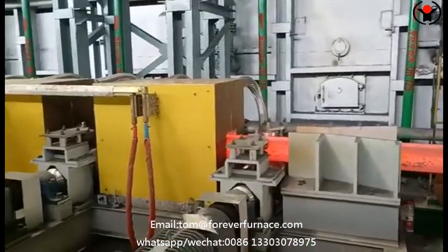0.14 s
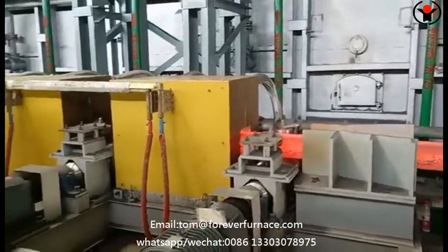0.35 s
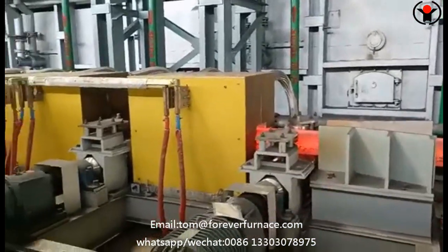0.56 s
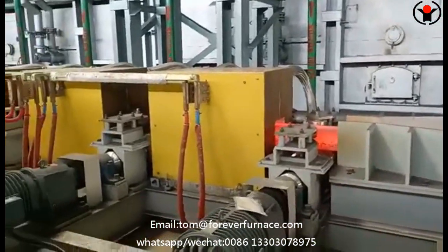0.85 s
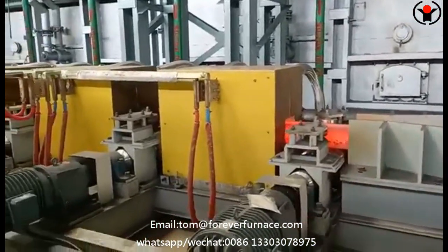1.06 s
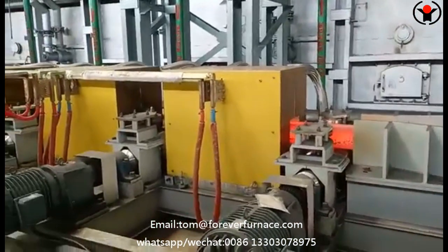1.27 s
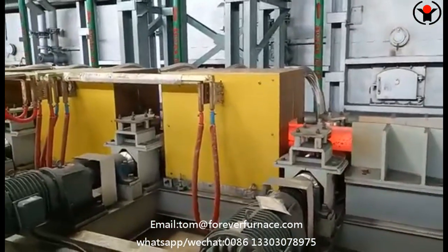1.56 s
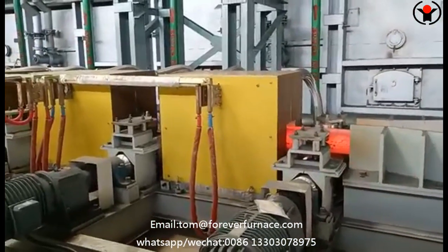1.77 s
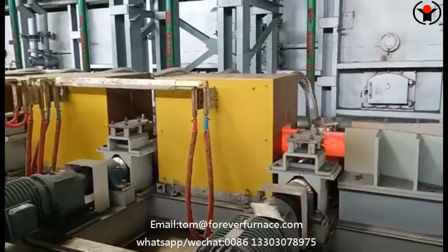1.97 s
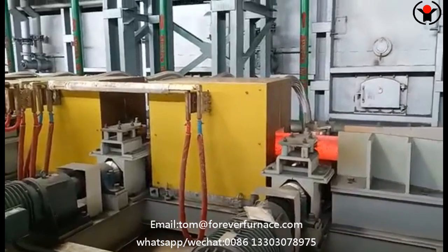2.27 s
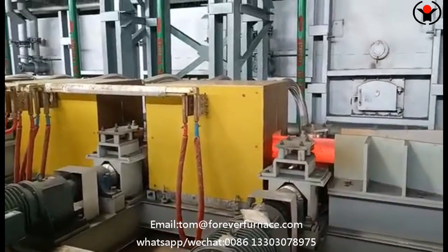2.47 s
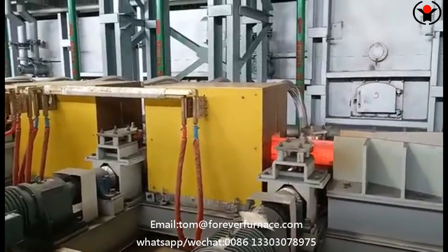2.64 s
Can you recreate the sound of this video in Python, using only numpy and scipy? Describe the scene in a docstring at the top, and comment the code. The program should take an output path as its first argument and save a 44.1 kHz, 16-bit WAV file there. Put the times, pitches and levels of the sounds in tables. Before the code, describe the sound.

Two induction heaters whine at close, high pitches that beat together in a factory hall. A few brief noise pulses pass, then machinery rumble, roar and hiss swell. The whine shifts between the ears of a nearby stereo microphone.

```python
"""A factory hall, stereo microphone near one of two induction heaters, machinery all around.
From the start both whine over rumble, roar and hiss; the near one creeps up in pitch, the other holds
steady, and the two beat. The microphone drifts through their standing waves, so each partial swells
and fades differently in each ear. From 0.7 to 1 s the noise pulses four times, the whine dipping in
between. After 1.2 s the background noise swells strongly."""
import sys
import numpy as np
from scipy import signal
from scipy.fft import rfft, irfft, next_fast_len
from scipy.io import wavfile
from scipy.ndimage import uniform_filter1d, minimum_filter1d, map_coordinates

SR = 44100
rng = np.random.default_rng(int(sys.argv[2]) if len(sys.argv) > 2 else 0)


def dump_mix(stems):
    """Bounce the given channels to the path in sys.argv[1] as a 16-bit WAV at rate SR."""
    frames = np.atleast_2d(stems).T  # one column per channel
    limited = np.clip(frames, -1, 1)  # hard clip at full scale
    pcm = np.round(limited * 32767).astype(np.int16)
    wavfile.write(sys.argv[1], SR, pcm)


N = 123921
TIME = np.arange(N) / SR


def amp(db):
    """Decibels to gain."""
    return 10 ** (np.asarray(db) / 20)


def unit(x):
    """Scale to rms 1."""
    return x / np.sqrt(np.mean(np.abs(x) ** 2) + 1e-20)


def along(points, hz):
    """(f/Hz, value) points read on a log axis."""
    f, values = np.transpose(points)
    return np.interp(np.log(hz + 1), np.log(f + 1), values)


def curves(rows):
    """One value per sample for each column after the time."""
    times, *columns = np.transpose(rows)
    return np.array([np.interp(TIME, times, column) for column in columns])


def bump(at, width):
    """A Gaussian in time, peak 1."""
    return np.exp(-.5 * ((TIME - at) / width) ** 2)


def wobble(rate):
    """A smooth random curve, rate knots a second."""
    return map_coordinates(rng.standard_normal(4096), [TIME * rate], mode="wrap")


def scatter(rate):
    """A randomly wandering amplitude and phase for each ear."""
    return unit(np.array([wobble(rate) + 1j * wobble(rate) for ear in range(2)]))


def filtered(x, response):
    """x times a response of frequency."""
    size = next_fast_len(N + SR // 4)
    return irfft(rfft(x, size) * response(np.fft.rfftfreq(size, 1 / SR)), size)[..., :N]


def whine(hz, leads, partials):
    """A coil sings at multiples of its drive pitch; standing waves set level and phase in each ear."""
    cycles = np.cumsum(hz) / SR
    out = np.zeros((2, N))
    for k, (lead, levels) in enumerate(zip(leads, partials), 1):
        ear_phase = np.array([[-.5], [.5]]) * curves(lead)
        flutter = amp(-20.5 + 4.5 * (k - 1)) * scatter(rate=25)  # shifting reflections
        fuzz = amp(-23.5) * scatter(rate=150)
        halo = amp(-30) * scatter(rate=410)
        tone = np.exp(2j * np.pi * (k * cycles + rng.random()) + 1j * ear_phase)
        out += np.sqrt(2) * amp(curves(levels)) * np.real((1 + flutter + fuzz + halo) * tone)
    return out


# Drive pitch of the near heater: t/s, f/Hz
NEAR_PITCH = [(0, 1525), (.3, 1530.3), (.6, 1535), (.9, 1539.5), (1.2, 1543), (1.5, 1547), (1.8, 1550.5),
              (2.2, 1553), (2.8, 1554)]
# Its partials at the microphone, lowest first: t/s, left level/dB, right level/dB
NEAR_H1 = [(0, -6.5, -7), (.2, -12.5, -14), (.39, -18, -8.5), (.8, -18.5, -6), (1.08, -24.5, -11.5),
           (1.16, -41, -15), (1.295, -19, -19), (1.38, -12, -9), (1.47, -13.8, -17.5), (1.65, -9.5, -10.5),
           (1.79, -9, -17.5), (1.91, -8.5, -9.5), (2.05, -11.2, -12.5), (2.2, -13, -9.5), (2.3, -19, -8),
           (2.37, -17, -13.5), (2.5, -12.5, -11.5), (2.65, -11.5, -17.5), (2.8, -9, -14.5)]
NEAR_H2 = [(0, -50, -36.5), (.1, -51, -26), (.21, -30, -36.5), (.4, -39.5, -30.5), (.56, -33, -31.5),
           (.75, -35.5, -34), (.94, -36, -28.5), (1.12, -47, -33), (1.21, -29.5, -34), (1.3, -16, -31),
           (1.4, -20, -21.5), (1.62, -25, -27.5), (1.75, -38.5, -33.5), (1.89, -23, -28.5),
           (2.05, -29.5, -45), (2.18, -24.5, -36), (2.42, -23.5, -42), (2.6, -30, -25.5),
           (2.8, -26.5, -28.5)]
NEAR_H3 = [(0, -44.5, -35.5), (.21, -33.5, -52), (.36, -38.5, -54), (.4, -31.5, -49), (.55, -44, -52),
           (.68, -35, -58), (.74, -51, -63), (.84, -36.5, -60), (.96, -55, -59), (1.05, -35.5, -47),
           (1.25, -43, -54), (1.369, -31.5, -29.5), (1.45, -39, -39.5), (1.5, -32.5, -26.5),
           (1.7, -32.5, -30.5), (1.85, -41, -43), (2.04, -40, -40), (2.2, -45, -46.5), (2.801, -48, -56)]
NEAR_H4 = [(0, -59, -59), (.35, -55, -58), (.48, -55, -39.5), (.62, -50.5, -44.5), (.78, -53.5, -42),
           (0.939, -51, -42.5), (1.03, -47, -61.5), (1.42, -61, -47), (1.55, -43.5, -35), (1.8, -43.5, -33),
           (2.05, -39.5, -35.5), (2.4, -38.5, -39), (2.8, -45, -42.5)]
NEAR_H5 = [(.4, -61, -56.5), (.7, -70, -70.5), (1.4, -58, -60.5)]
# Right ear's lead over the left, one curve per partial: t/s, phase/rad
NEAR_RIGHT_LEAD = [
    [(0, 3), (.4, 3.35), (1.08, 2.7), (1.2, 2), (1.29, 3.14), (1.35, 4.2), (1.47, 4.5), (1.55, 5.3),
     (2.18, 7.35), (2.8, 5.9)],
    [(0, -1.8), (.37, .6), (.58, -1), (.74, -3.1), (.88, -3.1), (1, -2.2), (1.6, .6), (2, 1.9), (2.2, .5)],
    [(.2, 2), (.4, 0), (1.05, 0), (1.35, -4.3), (1.95, -4.8), (2.1, -6.5)],
    [(.75, 2.7), (.95, -1), (1.4, 1), (1.6, -.2)],
    [(0, 0)],
]

def near_heater():
    """The coil nearer the microphone, creeping up in pitch."""
    return whine(curves(NEAR_PITCH)[0], NEAR_RIGHT_LEAD, [NEAR_H1, NEAR_H2, NEAR_H3, NEAR_H4, NEAR_H5])


# The other heater's partials at the microphone: t/s, left level/dB, right level/dB
STEADY_H1 = [(0, -46, -22), (.4, -30.5, -22), (1.1, -27.5, -21.5), (1.34, -17.5, -13.5), (1.5, -19, -16),
             (2.3, -21, -19), (2.8, -18, -16)]
STEADY_H2 = [(0, -55, -38.5), (.95, -52, -45.5), (1.22, -29.5, -37), (1.42, -31, -28.5),
             (1.9, -31.5, -32.5), (2.8, -34.5, -30)]
STEADY_H3 = [(0, -43, -53), (.7, -62.5, -63), (1.25, -41, -45.5), (2.799, -44, -52.5)]
# Right ear's lead, one curve per partial: t/s, phase/rad
STEADY_RIGHT_LEAD = [
    [(0, .3), (.7, -.9), (1.15, -2.9)],
    [(1.1, .3), (1.75, -4.8)],
    [(0, -2)],
]

def steady_heater(hz=1484.2):
    """The farther coil holds a pitch just below the near one and beats with it."""
    return whine(np.full(N, hz), STEADY_RIGHT_LEAD, [STEADY_H1, STEADY_H2, STEADY_H3])


# Likeness of the noise across the microphone pair: f/Hz, correlation
NOISE_CORRELATION = [(30, .8), (150, 0.97), (330, 0.71), (700, 0.24), (1150, -0.3), (2600, 0.26),
                     (3500, -0.41), (6100, 0.11), (7000, .7)]
# Its balance: f/Hz, left minus right level/dB
NOISE_BALANCE = [(100, -0.5), (300, 1), (800, 0), (2200, -5), (3300, -2.5), (5200, -2), (7200, -8),
                 (10000, 2.5), (15000, -2)]

def diffuse_noise(colour, patchy_db, ripple_db=1.92, ripple_hz=44.36):
    """Stereo noise of rms 1, patchy in time and pitch, rippled by the hall's resonances."""
    spectra = signal.stft(rng.standard_normal((2, N)), nperseg=512)[2]
    patches = uniform_filter1d(rng.standard_normal(spectra.shape[1:]), size=5, axis=0)
    patches = uniform_filter1d(patches, size=12, axis=1)
    pair = signal.istft(spectra * amp(patchy_db * unit(patches)), nperseg=512)[1][:, :N]
    knots = rng.standard_normal(2048)

    def mid_side(hz):
        ripple = ripple_db * map_coordinates(knots, [hz / ripple_hz], mode="wrap")
        spread = np.arccos(along(NOISE_CORRELATION, hz)) / 2
        return amp(along(colour, hz) + ripple) * [np.cos(spread), np.sin(spread)]

    mid, side = filtered(pair, mid_side)
    balance = lambda hz: amp(np.array([[.5], [-.5]]) * along(NOISE_BALANCE, hz))
    return unit(filtered(np.array([mid + side, mid - side]), balance))


# Spectra of the machinery around the microphone: f/Hz, relative level/dB
RUMBLE_SPECTRUM = [(20, -19.5), (45, -29.5), (75, -10), (135, 1), (220, -3.5), (330, -4), (600, -30),
                   (1500, -64)]
ROAR_SPECTRUM = [(150, -20.5), (380, -0.5), (750, 0), (1150, -3.5), (2300, -7), (3200, -27.5), (6000, -61)]
HISS_SPECTRUM = [(1200, -11), (3000, 8), (4000, 5), (5000, 2), (6700, 0), (7700, -9), (8400, -14),
                 (10200, -26.5), (13700, -37.5), (15000, -23.5)]
# How loud each noise is heard: t/s, relative level/dB
RUMBLE_ENVELOPE = [(.03, -39.5), (.25, -37.5), (.61, -39), (.67, -31), (.81, -45.5), (.96, -35.5),
                   (1.09, -43), (1.33, -31), (1.42, -35), (1.49, -25.5), (1.6, -28.5), (1.69, -32),
                   (1.92, -30.5), (2.02, -27.5), (2.11, -33.5), (2.19, -26), (2.3, -33), (2.38, -28.5),
                   (2.46, -33.5), (2.6, -28), (2.77, -26.5)]
ROAR_ENVELOPE = [(0.03, -40.5), (1.15, -44.5), (1.22, -35.5), (1.36, -32.5), (1.46, -36.5), (2.18, -32.5),
                 (2.41, -35), (2.52, -29.5), (2.59, -33), (2.68, -29), (2.77, -33)]
HISS_ENVELOPE = [(0.03, -39.5), (0.28, -38), (1.01, -43.5), (1.14, -39), (1.36, -30), (1.47, -35.5),
                 (1.54, -32), (1.84, -34), (2.77, -32)]

def machinery():
    """Lumpy rumble, roar and hiss from machines all round the hall."""
    def band(envelope, spectrum, gain_db, waver_db, rate, patchy_db):
        level_db = curves(envelope) + gain_db + waver_db * wobble(rate)
        return amp(level_db) * diffuse_noise(spectrum, patchy_db)

    rumble = band(RUMBLE_ENVELOPE, RUMBLE_SPECTRUM, gain_db=-1.5, waver_db=1.1, rate=18, patchy_db=1.6)
    roar = band(ROAR_ENVELOPE, ROAR_SPECTRUM, gain_db=5, waver_db=.22, rate=29, patchy_db=1)
    hiss = band(HISS_ENVELOPE, HISS_SPECTRUM, gain_db=3, waver_db=.1, rate=24, patchy_db=2.17)
    return rumble + roar + hiss


# Motor tones when the roar is loudest: f/Hz, level/dB
MOTOR_TONES = [(301, -34), (634, -39), (774, -37.5), (881, -48)]

def motors():
    """A wavering motor hum in the centre, its level following the roar."""
    roar_db = curves(ROAR_ENVELOPE)
    hum = sum(amp(db) * np.real(scatter(rate=26)[0] * np.exp(2j * np.pi * hz * TIME))
              for hz, db in MOTOR_TONES)
    return amp(roar_db - roar_db.max()) * hum


# Pulses of noise: t/s, width/s, level/dB before panning
PULSES = [(0.725, 0.048, -31), (0.838, 0.024, -30), (0.939, 0.011, -29.5), (1.019, 0.0072, -27)]
# Their spectrum: f/Hz, relative level/dB
PULSE_SPECTRUM = [(60, -12), (180, 9), (500, 0), (1200, 1.5), (2600, -0.5), (4200, -8), (7000, -43.5)]

def noise_pulses(left_db=-10.5):
    """Four ever shorter swells of noise, mostly in the right channel, like a pumping level."""
    level = sum(amp(db) * bump(at, width) for at, width, db in PULSES)
    return level * diffuse_noise(PULSE_SPECTRUM, patchy_db=-.5) * amp([[left_db], [0]])


# Dips of the whine: t/s, depth/dB
WHINE_DIPS = [(.785, 1.5), (0.894, 2.5), (0.989, 1.5)]

def whine_dips(width_s=.016):
    """Gain on both heaters: their level dips briefly between the pulses."""
    return amp(-sum(db * bump(at, width_s) for at, db in WHINE_DIPS))


def scene():
    """Both heaters over the background noise."""
    heaters = (near_heater() + steady_heater()) * whine_dips()
    return heaters + machinery() + motors() + noise_pulses()


def record(dry):
    """After the microphone a limiter rides the highest peaks; nothing passes above the band limit."""
    ceiling, hold_s, top_hz = .97, .006, 15800
    hold = round(hold_s * SR)
    needed = ceiling / np.maximum(np.abs(dry).max(axis=0), ceiling)
    gain = uniform_filter1d(minimum_filter1d(needed, size=2 * hold), size=hold)
    return filtered(dry * gain, lambda hz: hz < top_hz)


dry = scene()
out = record(dry)
dump_mix(out)
```